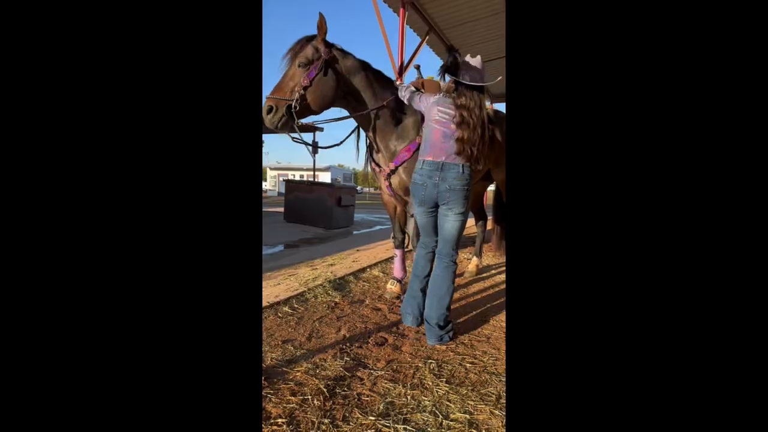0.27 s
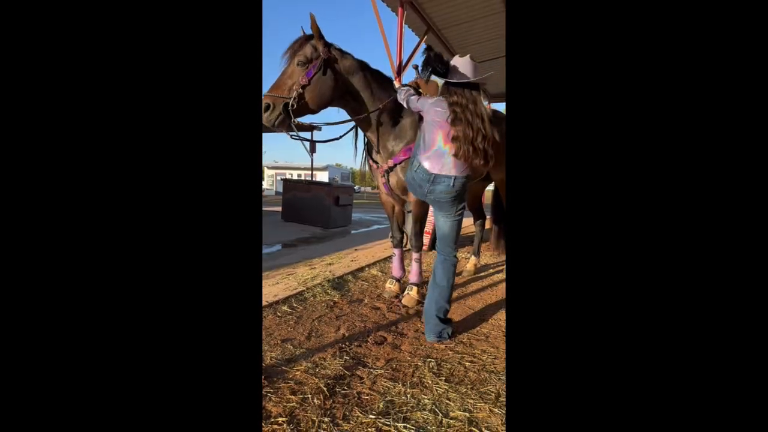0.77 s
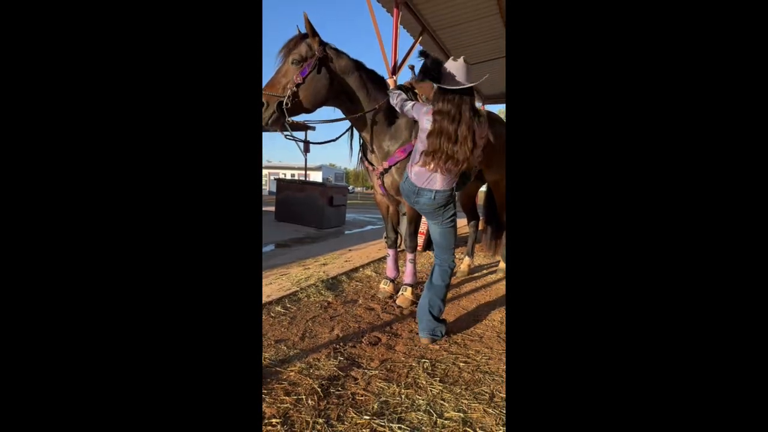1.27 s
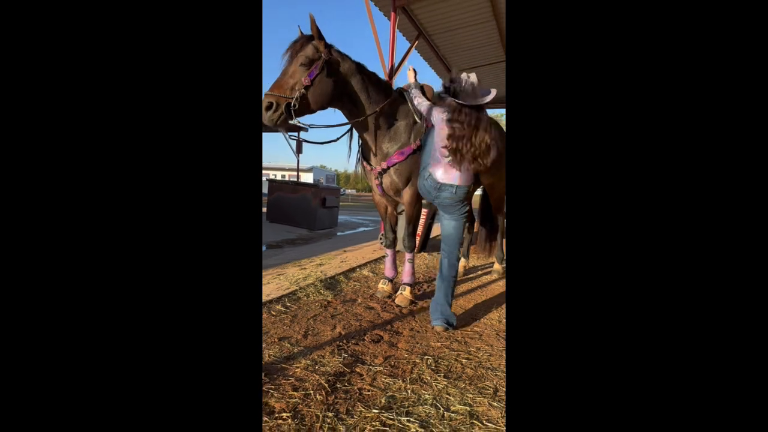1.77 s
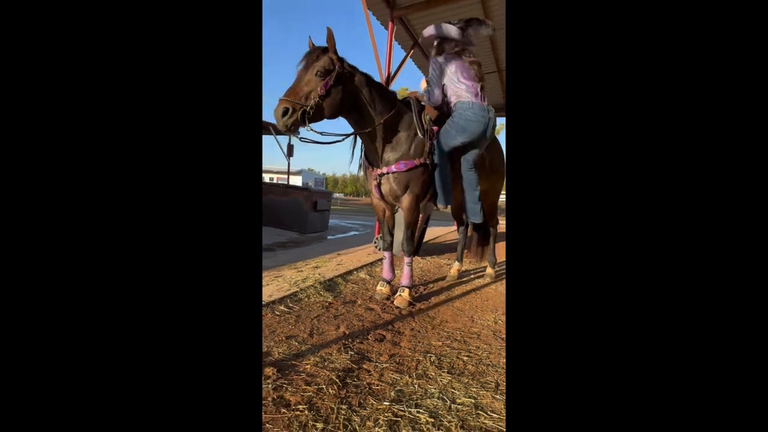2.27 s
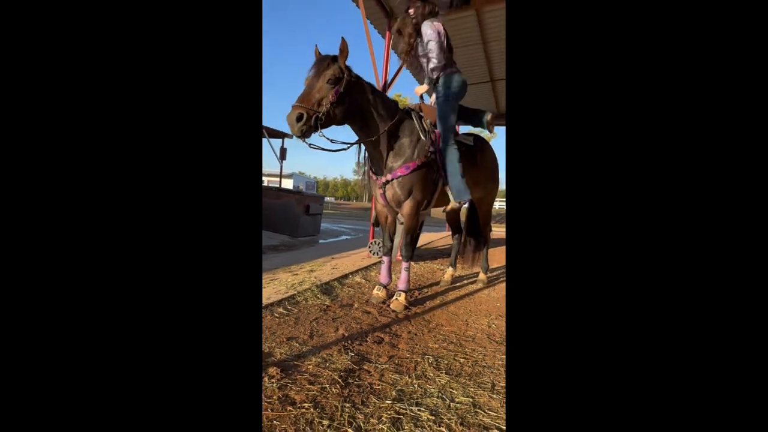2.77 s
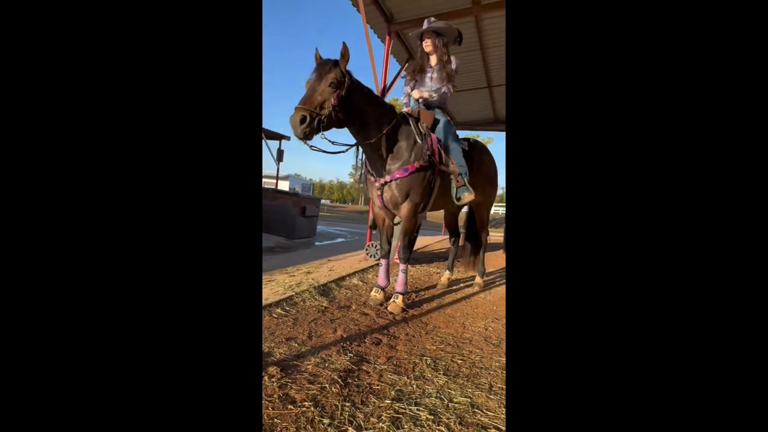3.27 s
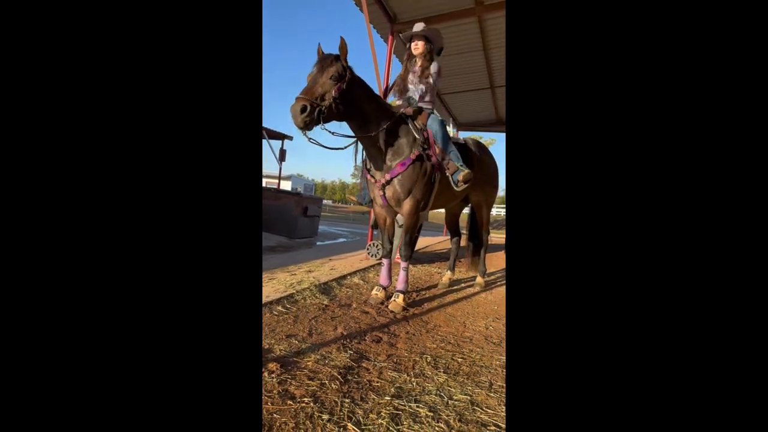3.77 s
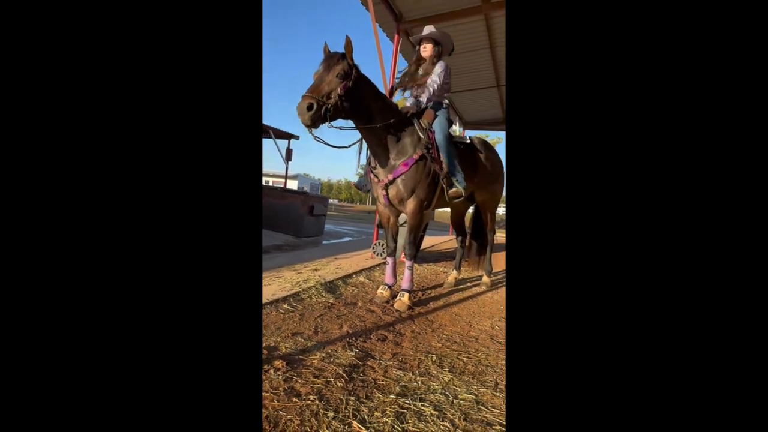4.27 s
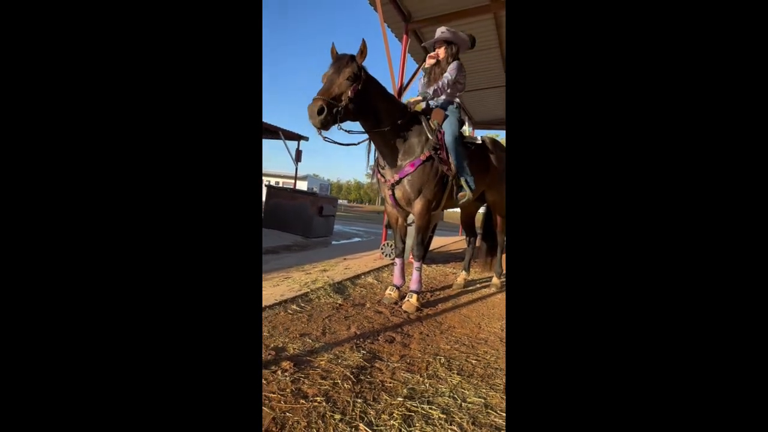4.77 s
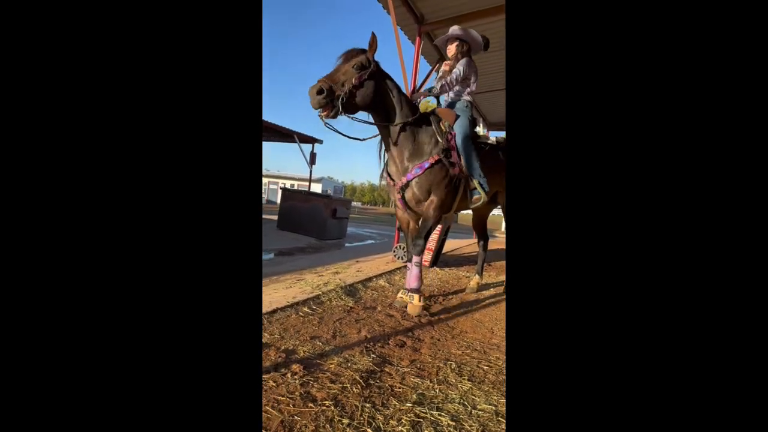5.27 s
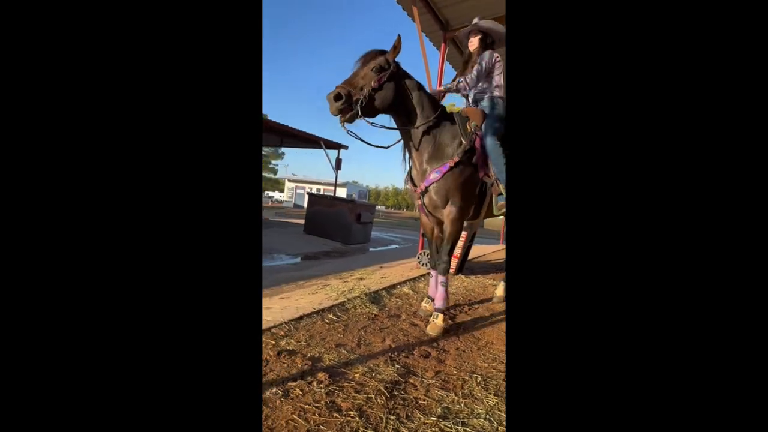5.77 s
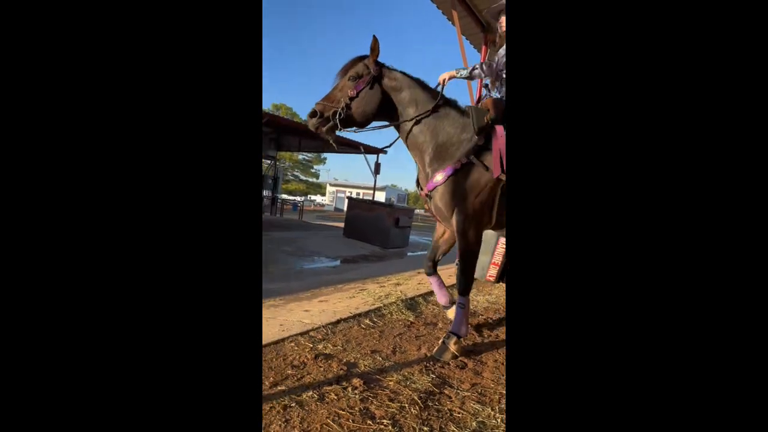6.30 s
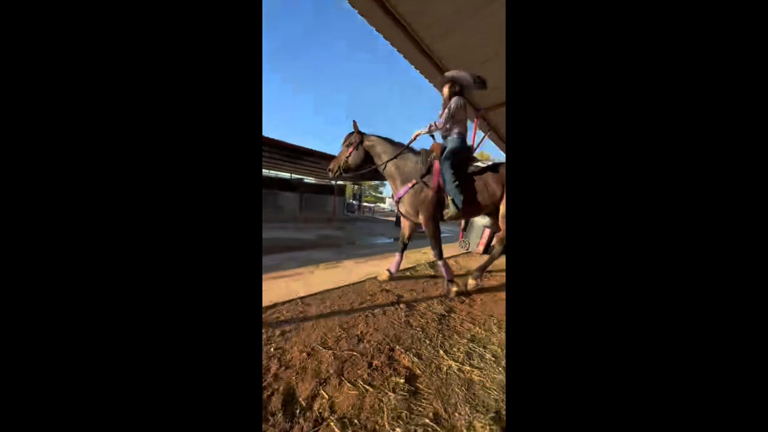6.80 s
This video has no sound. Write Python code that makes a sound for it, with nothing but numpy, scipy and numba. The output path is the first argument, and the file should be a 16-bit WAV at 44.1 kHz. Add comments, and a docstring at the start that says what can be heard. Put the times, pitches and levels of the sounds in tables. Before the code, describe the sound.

Sparrows chirp under a tin roof with soft tack knocks and leather rubs, then a close horse whinnies shrilly and sinks into a throaty grunt.

```python
"""A horse whinnies close to a phone under a tin roof at a show ground: a whistle climbs over throbbing low
voice and breath, then the call sinks to a grunt. The whistle is a near sine; folds and air ring the throat.
Sparrows chirp in the rafters as warbling sines with roof echoes. Tack knocks and clicks as short contacts
ring modes, and rubs as flickering noise. Far off an engine drones as wavering sines over the yard's noise."""
import sys
import numpy as np
from scipy import signal
from scipy.fft import rfft, irfft
from scipy.io import wavfile
from scipy.ndimage import uniform_filter1d
from numba import njit

SR = 44100
rng = np.random.default_rng(int(sys.argv[2]) if len(sys.argv) > 2 else 0)


def int16_out(signal):
    """Quantize to a 16-bit WAV file."""
    q = np.round(np.clip(np.atleast_2d(signal).T, -1, 1) * 32767)
    wavfile.write(sys.argv[1], SR, q.astype(np.int16))


N = 310464
T = np.arange(N) / SR
HZ = np.maximum(np.fft.rfftfreq(N, 1 / SR), 1)
VOICE_FROM = int(4.7 * SR)  # first sample of the throat sound

# throbs of the low voice: (centre [s], half-length [s], pitch [Hz], tone level [dB], rasp level [dB])
THROBS = [(5.205, 0.027, 720, -35.5, -61), (5.24, 0.04, 740, -35.5, -43), (5.295, 0.043, 558.7, -26, -36.5),
          (5.374, 0.069, 724, -61, -41.5), (5.441, 0.053, 795, -46, -40), (5.529, 0.035, 785.5, -65, -42.5),
          (5.613, 0.035, 775, -61, -48.5), (5.697, 0.027, 786, -32.5, -34.5),
          (5.785, 0.04, 746.2, -30, -31), (5.863, 0.032, 706, -33, -35), (5.893, 0.03, 650.3, -27.5, -40),
          (5.98, 0.044, 537, -24.5, -27.5), (6.073, 0.043, 521.8, -26.5, -32.5),
          (6.172, 0.042, 512.1, -30, -37), (6.261, 0.03, 531.5, -26, -48), (6.291, 0.035, 706, -39, -37),
          (6.35, 0.036, 544.8, -29, -53), (6.398, 0.03, 153.3, -15, -19.5),
          (6.508, 0.056, 137.3, -13, -26.5), (6.552, 0.036, 159.7, -16, -21),
          (6.583, 0.029, 140.8, -11, -38)]
# upper throat and nose resonances: (centre [Hz], nominal width [Hz], level [dB])
THROAT_HIGH = [(1975, 130, 1.5), (2370, 190, -1.5), (2550, 48, 7), (2703, 83, -3), (3307, 135, 1),
               (3686, 78, 4), (3952, 105, 3.5), (4566, 91, -0.5), (4990, 120, -10), (5267, 140, -2),
               (5625, 150, -2), (6010, 110, -4.5), (6370, 220, -6), (6950, 320, -8.5), (7610, 430, -9),
               (8370, 530, -10.5), (9270, 820, -13)]


def undb(db):
    """Decibels to an amplitude factor."""
    return np.exp(np.asarray(db) * np.log(10) / 20)


def unit(x):
    """Scale to an RMS of one."""
    return x / np.sqrt(np.mean(x ** 2))


def curves(rows):
    """Columns joined by straight lines over time, and a gate that is silent outside their span."""
    s, *columns = np.transpose(rows)
    gate = np.clip(np.minimum(T - s[0], s[-1] - T) / 0.0049, 0, 1)
    return [np.interp(T, s, c) for c in columns], gate


def along(points):
    """A curve over frequency, straight between points on a log axis."""
    hz, value = np.transpose(points)
    return np.interp(np.log(HZ), np.log(hz), value)


def walk(rate, size=N):
    """Random levels held 1 / rate s and slewed twice; spread near 1."""
    k = int(SR / rate) + 1
    held = np.repeat(rng.standard_normal(size // k + 1), k)
    return 1.3 * uniform_filter1d(uniform_filter1d(held, k), k)[:size]


def sine(hz):
    """A sine of RMS one that follows a moving pitch."""
    return np.sqrt(2) * np.sin(2 * np.pi * np.cumsum(hz) / SR)


def resonance(hz, width):
    """A band-pass applied twice so the valleys stay dark."""
    return 1 / (1 + .64j * (HZ ** 2 - hz ** 2) / (HZ * width)) ** 2


def ring(x, modes):
    """Resonances side by side with alternating sign."""
    response = sum((-1) ** k * undb(db) * resonance(hz, width) for k, (hz, width, db) in enumerate(modes))
    return unit(irfft(rfft(x) * response, N))


def band(x, hz, width):
    """One resonance alone."""
    return ring(x, [(hz, width, 0)])


def ports(pair):
    """Independent mid and side spectra to left and right microphone ports, most alike in the bass."""
    # likeness of the two ports: (frequency [Hz], left-right correlation [0-1])
    likeness = [(30, .995), (60, .995), (130, .995), (200, .98), (290, 0.88), (640, 0.4), (1400, 0.6),
                (3100, 0.15), (6000, 0.2), (9000, .1)]
    c = np.clip(along(likeness), 0, 1)
    mid, side = pair[0] * np.sqrt((1 + c) / 2), pair[1] * np.sqrt((1 - c) / 2)
    return irfft(np.array([mid + side, mid - side]), N)


def roof(x, t60, wet_db, first_s):
    """Direct sound plus a decaying scatter of echoes that starts after first_s."""
    tail = rng.standard_normal((2, N)) * np.exp(-np.log(1000) * T / t60) * (T > first_s)
    tail = tail / np.sqrt(np.sum(tail ** 2) / 2)
    return x + undb(wet_db) * ports(rfft(tail) * rfft(x))


def engine():
    """A far engine: sines at multiples of the firing rate, each wavering in pitch and level."""
    # the drone: (time [s], firing rate [Hz], level before wavering [dB])
    firing = [(0, 77.9, -45.5), (1.8, 76.98, -41.5), (2.0, 76.77, -34), (2.7, 73.2, -41),
              (3.3, 70.1, -40.5), (4.1, 68.92, -40), (5, 70.56, -35), (6.3, 71.77, -34),
              (7.04, 71.57, -40.5)]
    # parts of the drone: (multiple of the firing rate, relative level [dB])
    orders = [(1, -2), (1.5, -15), (2, -14.5), (3, -23.5)]
    (hz, db), _ = curves(firing)
    drone = 0
    for k, order_db in orders:
        level = undb(db + order_db + 2.5 * walk(5.6))
        drone = drone + level * sine(k * hz * (1 + 0.0206 * walk(4.5)))
    return drone


def low_tone():
    """A faint low tone that glides briefly, a single sine."""
    # the tone: (time [s], pitch [Hz], level [dB])
    glide = [(4.06, 270, -50), (4.074, 275, -58), (4.11, 289, -39.5), (4.132, 319, -46), (4.172, 310, -49),
             (4.28, 268, -52)]
    (hz, db), on = curves(glide)
    return on * undb(db) * sine(hz)


def yard():
    """Background of the place: noise in overlapping bands that swell together and flicker apart."""
    # colour of the background: (frequency [Hz], relative level per Hz [dB])
    colour = [(15, -38), (25, -18), (52, -0.5), (76, 0), (219, -9.5), (386, -21), (1030, -24.5),
              (1970, -36), (3850, -26), (4500, -33.5), (5120, -34.5), (8580, -46.5), (9510, -50),
              (10800, -84), (12000, -88), (15600, -116), (22000, -120)]
    noise = rfft(rng.standard_normal((2, N))) * undb(along(colour))
    air, swell = 0, walk(0.96)
    for octave in np.arange(4.5, 14, .75):  # band centres, log2 of Hz
        share = np.clip(1 - abs(np.log2(HZ) - octave) / .75, 0, 1)
        air = air + ports(noise * share) * undb(.8 * swell + 1.4 * walk(8))
    return unit(air) * undb(-42.5) + engine() + low_tone()


def flock(db):
    """About a hundred faint falling chirps of far birds at random moments; later draws fall past the end."""
    draws = rng.uniform(size=(130, 3)) * [1, 1, 1900] + [0, 0, 3800]
    return [(s * 8.9, .03, .04, hz, .8 * hz, db - 6 * size, db - 7.5) for s, size, hz in draws]


def chirp(s, high_s, low_s, high_hz, low_hz, high_db, low_db):
    """Corners (s, dB, Hz) of one call: rising attack, waning high note, step, swelling low note, fade."""
    step, end = s + high_s, s + high_s + low_s
    rise = min(.022, high_s / 2)
    half = min(0.0158, high_s, low_s) / 2
    sag, lift = .95, 1.05  # pitch ratios: the high note sags, the low note lifts
    return [(s, high_db - 20, .82 * high_hz),
            (s + rise, high_db, high_hz),
            (step - half, high_db - 1, sag * high_hz),
            (step + half, low_db - 7, low_hz / lift),
            (end, low_db, low_hz),
            (end + .011, low_db - 34, low_hz * lift)]


def sparrows():
    """Two-note whistles, mostly falling, under a fast uneven warble, each from its own perch in the roof."""
    # near calls: (start [s], high note [s], low note [s], high pitch [Hz], low pitch [Hz],
    # high level [dB], low level [dB]), pitch and level before the warble and flutter
    near_calls = [(0.0, 0.034, 0.072, 4425, 3550, -35.5, -38.5), (.03, .02, 0.023, 2600, 2550, -57, -65),
                  (.862, 0.0096, 0.021, 3845, 3410, -30, -50), (.007, 0.016, 0.016, 5100, 4970, -40.5, -69),
                  (.334, 0.04, 0.041, 5750, 5660, -46, -46), (.442, 0.062, 0.047, 4240, 3524, -45.5, -40),
                  (.548, 0.023, 0.029, 3060, 2810, -52, -53), (.65, 0.041, 0.0063, 4410, 3670, -44, -36),
                  (.715, .025, 0.021, 2800, 2650, -51, -50), (.77, 0.042, 0.066, 4700, 3490, -41.5, -41),
                  (1.035, 0.024, 0.016, 4420, 3730, -50.5, -46.5),
                  (1.15, 0.069, 0.035, 5180, 4820, -65, -57), (1.46, 0.024, 0.021, 5520, 4930, -53, -47),
                  (1.482, 0.047, 0.064, 4570, 3560, -40, -40),
                  (1.725, 0.035, 0.033, 4230, 3560, -44, -42.5), (1.82, .02, 0.036, 3010, 2720, -51, -59),
                  (1.933, 0.041, 0.027, 4470, 3700, -49, -45),
                  (2.04, 0.029, 0.047, 4020, 3320, -41.5, -42.5), (2.29, 0.03, 0.05, 2480, 2630, -64, -66),
                  (2.68, .04, .05, 2470, 2600, -66, -60), (2.39, 0.031, 0.018, 5660, 4880, -49.5, -43),
                  (2.412, 0.046, 0.071, 4440, 3514, -38.5, -38.5),
                  (2.54, .015, 0.036, 2890, 2520, -47, -51), (1.99, 0.0147, 0.022, 4300, 3440, -43, -44),
                  (2.72, .02, 0.022, 5570, 5460, -63, -54), (2.771, 0.018, .02, 5120, 4920, -53, -51),
                  (2.79, 0.011, 0.014, 4520, 3860, -51, -50), (2.83, 0.026, 0.077, 5600, 5800, -46, -48.5),
                  (2.878, 0.029, 0.058, 4090, 3475, -39.5, -42),
                  (2.978, 0.013, 0.011, 3010, 2800, -43, -69),
                  (3.085, 0.0093, 0.0098, 4530, 4560, -42.5, -50),
                  (3.144, 0.013, 0.025, 3400, 3310, -48, -50.5),
                  (3.222, 0.035, 0.046, 5560, 5300, -50, -46.5), (3.285, 0.08, 0.035, 4520, 3444, -44, -39),
                  (3.385, 0.015, 0.015, 5460, 5240, -47, -54),
                  (3.472, 0.023, 0.021, 4390, 3380, -36.5, -40.5),
                  (3.535, 0.031, 0.018, 3000, 2670, -48, -51), (3.758, 0.013, 0.059, 5550, 5140, -46, -50),
                  (3.775, 0.0076, 0.012, 4680, 3816, -51, -52), (3.885, 0.014, 0.06, 4200, 3500, -38, -42),
                  (3.98, 0.012, 0.013, 2970, 2530, -50, -54), (4.175, 0.01, 0.019, 5530, 5370, -47, -47),
                  (4.18, 0.06, 0.07, 4403, 3480, -41, -45.5), (4.38, 0.091, 0.082, 4305, 3470, -49.5, -49),
                  (4.548, 0.021, 0.021, 5730, 5220, -45, -54), (4.617, 0.021, 0.023, 3600, 4480, -46, -46),
                  (4.762, 0.029, 0.022, 5220, 5350, -47, -50), (4.797, 0.0058, 0.014, 4850, 3997, -46, -65),
                  (4.846, 0.051, .05, 5360, 5270, -50, -59), (6.862, 0.034, 0.023, 4884, 4140, -46, -46),
                  (6.995, 0.02, 0.022, 4470, 4130, -41, -38)]
    out = np.zeros((2, N))
    beat = sine(400 * np.exp(0.18 * walk(30)))
    warble = 1 + .075 * (beat + 0.803 * walk(300)) / 2 + .03 * walk(60)
    flutter = undb(1.07 * walk(250) + 2 * walk(55) + 0.37 * beat)
    calls = near_calls + flock(db=-55.5)
    for call, side_db in zip(calls, rng.uniform(-5, 5.1, len(calls))):
        s, db, hz = np.transpose(chirp(*call))
        at = slice(int(s[0] * SR), int(s[-1] * SR))
        size = undb(np.interp(T[at], s, db)) * signal.windows.tukey(len(T[at]), .15) * flutter[at]
        note = np.interp(T[at], s, hz)
        shrill = np.clip((note - 2300) / 1500, .2, 1)  # low notes are steadier
        out[:, at] += size * sine(note * warble[at] ** shrill) * undb([[side_db], [-side_db]])
    close_echoes = roof(out, t60=0.14, wet_db=-0.5, first_s=0.0025)
    return roof(close_echoes, t60=0.52, wet_db=-3, first_s=0.015)


def blow(s, db, modes, scrape_s, push=0):
    """Modes rung by a short contact, part scrape and part smooth push, set to a peak level."""
    u = T[:SR // 4]
    modal = 0
    for hz, mode_db, t60 in modes:
        modal = modal + undb(mode_db) * np.sin(2 * np.pi * hz * u) * np.exp(-np.log(1000) * u / t60)
    contact = (push + rng.standard_normal(len(u))) * np.exp(-u / scrape_s)
    sound = signal.fftconvolve(modal, contact)
    out = np.zeros(N + len(sound))
    out[int(s * SR):int(s * SR) + len(sound)] = undb(db) * sound / abs(sound).max()
    return out[:N]


def rubs():
    """Cloth and leather rub as the rider mounts: dull and bright noise bands that flicker like tiny slips."""
    # rubs: (start [s], length [s], dull rub level [dB], bright rustle level [dB])
    strokes = [(0.3, 0.35, -74, -59), (0.557, 0.47, -74, -54.5), (1.367, 0.51, -55.5, -74),
               (1.663, 0.19, -53, -48), (1.827, 1, -52.5, -55.5), (2.587, 0.68, -59.5, -56),
               (2.814, 0.25, -53.5, -69), (3.208, 0.73, -57.5, -54), (3.863, 0.21, -55.5, -70),
               (4.196, 0.94, -64, -58.5)]
    attack_s, fade_db = .04, -16
    dull, bright = 0, 0
    for s, length, dull_db, bright_db in strokes:
        end = s + max(length, 1.5 * attack_s)
        (db,), on = curves([(s, fade_db), (s + attack_s, 0), (end, fade_db)])
        dull = dull + on * undb(db + dull_db)
        bright = bright + on * undb(db + bright_db)
    slips = rng.standard_normal((2, N)) * undb(2.6 * walk(90))
    return dull * band(slips[0], 840, 2600) + bright * band(slips[1], 4040, 2600)


def tack():
    """Dull boot and saddle knocks, bright buckle clicks and one hard clack, each a blow on a few modes."""
    # modes of the clack: (pitch [Hz], relative level [dB], decay by 60 dB [s])
    clack_modes = [(1133, 8, 0.022), (1430, -0.5, 0.014), (1720, -1.5, 0.025), (2180, -9, 0.014),
                   (2700, -18, 0.02), (3630, -13, 0.035)]
    # boot and saddle knocks: (time [s], peak level [dB], pitch [Hz])
    knocks = [(1.021, -29.5, 324), (1.677, -28, 311), (1.928, -28, 313), (2.609, -25, 337),
              (2.744, -28.5, 363), (2.785, -33, 776), (4.782, -26, 368), (6.836, -18, 854)]
    # buckle clicks: (time [s], peak level [dB], pitch [Hz])
    clicks = [(0.583, -34, 7240), (1.381, -31.5, 2460), (1.38, -46, 7200), (1.694, -51, 7000),
              (1.701, -37, 2200), (1.839, -35, 8100), (3.976, -35.5, 7640), (4.783, -31, 1260),
              (6.643, -30, 7400), (6.94, -29.5, 8754)]
    out = blow(6.6445, -3.5, clack_modes, scrape_s=0.000037, push=3)
    for s, db, hz in knocks:
        body = [(0.81 * hz, -2, .1), (hz, 0, .07), (1.39 * hz, -1, .05), (1.73 * hz, -4, .03)]
        out += blow(s, db, body, scrape_s=0.00022, push=3)
    for s, db, hz in clicks:
        metal = [(1.1 * hz, -2, .003), (hz, 0, .003), (1.17 * hz, -2, .003)]
        out += blow(s, db, metal, scrape_s=0.0024)
    return out + rubs()


def shaking(width_s):
    """How far the shake has set in (0-1), and the nearness of a throb (0-1)."""
    s = np.array(THROBS)[:, 0]
    nearest = s[np.searchsorted((s[1:] + s[:-1]) / 2, T)]
    near = np.exp(-((T - nearest) / width_s) ** 2)
    shake = np.clip((T - 5.4) / 0.24, 0, 1) * (T < 6.44)
    return shake, near


def held_tone():
    """A steady tone that holds under the whistle as it climbs away, a slightly wavering sine."""
    # the held tone: (time [s], pitch [Hz], level [dB]), before wavering
    steady = [(5.33, 1933, -51), (5.4, 1990, -41.5), (5.53, 2036, -29.5), (5.66, 2033, -51),
              (5.7, 1990, -32)]
    (hz, db), on = curves(steady)
    return on * undb(db + 2.7 * walk(40)) * sine(hz * (1 + 0.003 * walk(100)))


def whistle():
    """A near sine that sags in pitch and strength at each throb and swells on the 2 kHz resonance."""
    # high voice, before sag and swell: (time [s], pitch [Hz], level [dB], second harmonic level [dB])
    climb = [(4.93, 874, -41, -41), (4.95, 929.6, -25, -62), (4.985, 947, -26, -46),
             (5.025, 1454, -38, -74), (5.055, 1382, -28, -70), (5.075, 1510, -42, -66),
             (5.095, 1680, -47, -56), (5.14, 1630, -44, -39), (5.175, 1807, -55, -61),
             (5.3, 1916, -64, -35), (5.4, 2012, -39, -58), (5.48, 2148, -50, -53), (5.57, 2199, -34, -49),
             (5.66, 2243, -34, -40.5), (5.76, 2276, -29, -42), (5.88, 2273, -26.5, -39),
             (5.93, 2243, -34, -40), (5.97, 2148, -43, -46), (6.05, 2179, -44, -44),
             (6.225, 1956, -43.5, -42), (6.34, 1881, -37, -46), (6.37, 1880, -56, -60)]
    (top_hz, db, second_db), on = curves(climb)
    shake, near = shaking(width_s=.021)
    sag = 0.072 * shake * near  # share of the pitch
    hz = uniform_filter1d(top_hz, SR // 100) * (1 - sag) * (1 + 0.0026 * walk(120))
    lift_db = 9 / (1 + ((hz - THROAT_HIGH[0][0]) / 60) ** 2)
    dip_db = -175 * sag
    turn = 2 * np.pi * np.cumsum(hz) / SR
    # the third harmonic stands out where it crosses a resonance near 6.6 kHz, and dies as the voice tires
    third_db = -33.5 - 92 * np.maximum(T - 5.78, 0)
    third = undb(third_db) / (1 + ((3 * hz - 6650) / 280) ** 2)
    upper = undb(second_db) * np.sin(2 * turn) + third * np.sin(3 * turn)
    waver = undb(2 * walk(60) + dip_db)
    harmonics = undb(db + lift_db) * np.sin(turn) + undb(dip_db) * upper
    return held_tone() + np.sqrt(2) * on * waver * harmonics


def flaps(hz, jitter, rate, size_db=4.5):
    """One click per cycle of a wavering oscillator, each of its own size."""
    cycle = np.floor(np.cumsum(hz * np.exp(jitter * walk(rate))) / SR)
    return np.diff(cycle, prepend=0) * undb(size_db * rng.standard_normal(N))


@njit
def svf(x, hz, width):
    """Band-pass applied twice, its centre free to move every sample."""
    y = x.copy()
    for _ in range(2):
        b, l = 0., 0.  # band and low states
        for i in range(len(x)):
            g, k = np.tan(np.pi * hz[i] / SR), width / hz[i]
            v = (b + g * (y[i] - l)) / (1 + g * (g + k))
            b, l, y[i] = 2 * v - b, l + 2 * g * v, k * v
    return y


def patchy(sources, modes, flicker_db, slide=1):
    """Each narrow resonance lights up, fades and slides on its own as tongue and palate tremble."""
    size = N - VOICE_FROM
    out = np.zeros((len(sources), N))
    for k, (hz, width, db) in enumerate(modes):
        flicker = flicker_db * np.clip(150 / width, .7, 1) * walk(28, size=size)
        gain = (-1) ** k * undb(db + flicker)
        centre = hz * slide * (1 + .007 * walk(18, size=size))
        out[:, VOICE_FROM:] += [gain * svf(x[VOICE_FROM:], centre, width / 0.58) for x in sources]
    return [unit(x) * np.sqrt(size / N) for x in out]


def throbbing():
    """Tone and rasp strength, pitch and looseness of the low folds, which swell at each throb."""
    tone, rasp, loose = np.zeros(N), np.zeros(N), np.ones(N)
    pitch = np.interp(T, *np.array(THROBS)[:, [0, 2]].T)
    for s, length, hz, tone_db, rasp_db in THROBS:
        at = slice(int((s - length) * SR), int((s + length) * SR))
        u = (T[at] - s) / length
        swell = np.exp(-(np.where(u < 0, 1.7, 1.85) * u) ** 4)
        loose[at] *= 1 - np.sqrt(swell)
        tone[at] += undb(tone_db) * swell
        rasp[at] += undb(rasp_db) * swell
        # the folds start tight and drop onto their pitch
        glide = hz + .55 * (hz - 130) * np.clip(-.3 - u, 0, 1) / .3
        pitch[at] = np.where(abs(u) < .8, glide, pitch[at])
    return tone, rasp, pitch, loose


def chest_growl():
    """Uneven slaps and noise ring the chest, and every slap also lets a puff of bright air past."""
    # slapping: (time [s], rate [Hz], unevenness [0-1])
    slapping = [(4.7, 95, .2), (6.45, 100, .15), (6.62, 116, .04), (6.69, 111, .03), (6.725, 93, .04),
                (6.775, 108, .03), (6.83, 98, .04), (7.04, 90, .1)]
    # chest resonances: (centre [Hz], nominal width [Hz], level [dB])
    chest_modes = [(99, 42, -0.5), (205, 90, -5.5), (258, 66, 0.5), (326, 75, 0), (398, 106, -3.5)]
    (hz, uneven), _ = curves(slapping)
    slaps = unit(flaps(hz, uneven, 60, size_db=3.0))
    puffs = signal.lfilter([1], [1, -.992], slaps) * rng.standard_normal(N)
    rough = slaps + 4 * uneven * rng.standard_normal(N) + 0.42 * rng.standard_normal(N)
    return ring(rough, chest_modes) + undb(-27.5) * band(puffs, 2730, 2500)


def horse():
    """A whistle over a second voice of throbbing folds, which shares the throat with breath; a chest growl."""
    # air through the throat, before throbs and gaps:
    # (time [s], hiss level [dB], low breath level [dB], chest growl level [dB])
    breath = [(4.74, -65, -61, -54), (4.8, -53.5, -41, -32), (4.99, -42.5, -36, -38.5),
              (5.11, -37, -39, -46.5), (5.31, -31, -28.5, -45.5), (5.51, -31, -42, -69),
              (5.7, -33, -52, -93), (5.93, -30.5, -28.5, -64), (6.1, -30.5, -23, -37),
              (6.3, -32, -25, -35.5), (6.4, -32, -23.5, -31.5), (6.5, -35.5, -20.5, -28),
              (6.58, -39.5, -24, -26.5), (6.62, -38, -27, -21.5), (6.7, -42, -23.5, -18),
              (6.82, -45.5, -33, -20.5), (6.96, -52.5, -50, -42.5), (7.04, -50, -47, -59)]
    # change of breath level between throbs: (time [s], upper throat [dB], lower throat [dB])
    gaps = [(5.2, 4.5, -4), (5.5, -5, -1.5), (5.65, -11, -20), (5.76, -11, -4), (5.85, 4, -1),
            (6.1, 2.5, -11.5), (6.44, 4, 1.5), (6.47, 7, 0)]
    # lower throat resonances: (centre [Hz], nominal width [Hz], level [dB])
    throat_low = [(410, 99, -8), (559, 72, -5), (741.5, 75, -0.5), (921, 53, 0), (1136, 95, -1),
                  (1318, 49, -8.5), (1492, 63, -5.5)]
    # the lower throat lengthens as the call tires, then recovers: (time [s], resonance pitch ratio)
    throat_slide = [(4.7, 1.0), (5.6, 1.0), (5.95, .955), (6.3, .955), (6.45, 1.0), (7.04, 1.0)]
    tone, rasp, pitch, loose = throbbing()
    (hiss_db, low_db, growl_db), on = curves(breath)
    (high_gap_db, low_gap_db), in_gaps = curves(gaps)
    between = in_gaps * (1 - shaking(width_s=0.029)[1])

    # between throbs the folds flap without a steady pitch
    folds = unit(flaps(pitch, .025 + .3 * loose, 200)) + .6 * rng.standard_normal(N)
    turn = 2 * np.pi * np.cumsum(pitch * (1 + 0.0059 * walk(90))) / SR
    # the clean voice is a narrow pulse, so its overtones light up wherever they meet a resonance
    pulse = np.exp(40 * (np.cos(turn) - 1))
    air = rng.standard_normal(N) * undb(2.37 * walk(150)) + 0.5 * folds

    high, high_overtones = patchy([air, pulse], THROAT_HIGH, flicker_db=3.4)
    slide = curves(throat_slide)[0][0][VOICE_FROM:]
    low, low_overtones = patchy([folds, pulse], throat_low, flicker_db=3.4, slide=slide)

    # each throb also pushes more air through the upper throat and the chest
    tight = np.clip(pitch / 500, .5, 1)
    high = high * (on * undb(hiss_db + high_gap_db * between) + (0.23 + 0.4 * (1 - tight)) * rasp)
    low = low * (tight * rasp + on * undb(low_db + low_gap_db * between))
    growl = chest_growl() * (on * undb(growl_db) + 0.2 * rasp)
    harmonics = np.sqrt(2) * np.sin(turn) + 0.44 * tight ** 2 * np.sin(2 * turn)
    voiced = tone * (harmonics + undb(-10) * tight * low_overtones)
    return whistle() + voiced + undb(-3) * rasp * high_overtones + high + low + growl


def scene():
    """Horse and tack close to the microphone, sparrows overhead, the yard behind."""
    # near sound at the two ports: (frequency [Hz], side against mid [dB])
    near_side = [(60, -19), (200, -22.5), (380, -11), (700, -5.5), (1300, -8), (2400, -8.5), (4400, -0.5),
                 (8000, -4)]
    # near sound at the two ports: (frequency [Hz], left louder than right [dB])
    near_left = [(200, 0), (380, 1), (700, 2.5), (1300, 1.5), (2400, .5), (8000, 0)]
    near = horse() + tack()
    # the two ports hear the near sound a little out of phase, and its ground echoes differently
    early = rng.standard_normal(N) * np.exp(-np.log(1000) * T / 0.1)
    early = early / np.sqrt(np.sum(early ** 2))
    side = undb(along(near_side)) * (-.6j + .8 * rfft(early))
    difference = irfft(rfft(near) * side, N)
    close = roof(near, t60=0.42, wet_db=-9.5, first_s=0.0082) + difference * [[1], [-1]]
    close = irfft(rfft(close) * undb(along(near_left) * [[.5], [-.5]]), N)
    return close + sparrows() + yard()


def record(dry):
    """The phone's microphone loses the top octave; a steep cut at 15.7 kHz ends it."""
    # microphone response: (frequency [Hz], level [dB])
    response = [(20, -2), (8500, 0.5), (10000, 0.5), (11500, -19.5), (16000, -33)]
    heard = irfft(rfft(dry) * undb(along(response)), N)
    return signal.sosfilt(signal.ellip(8, .2, 70, 15700, fs=SR, output="sos"), heard)


dry = scene()
out = record(dry)
int16_out(out)
```